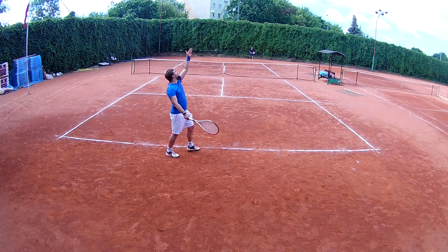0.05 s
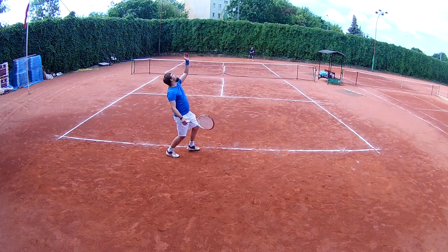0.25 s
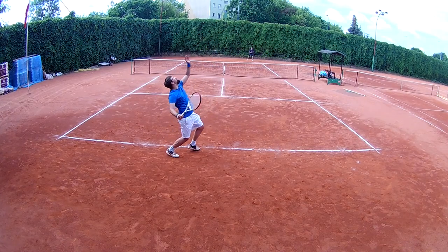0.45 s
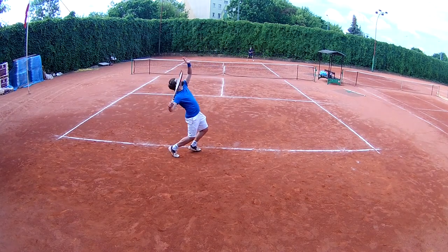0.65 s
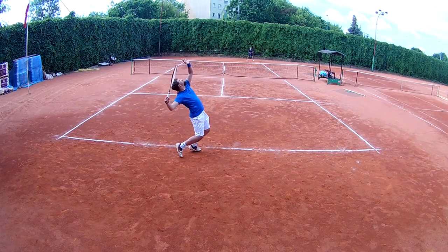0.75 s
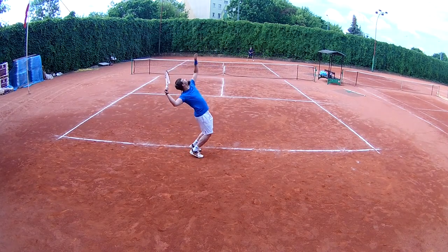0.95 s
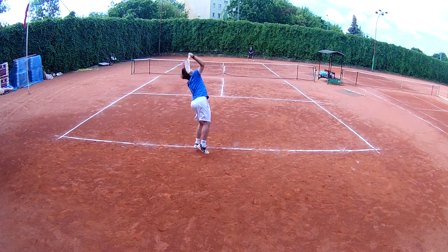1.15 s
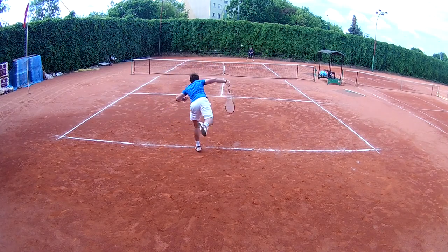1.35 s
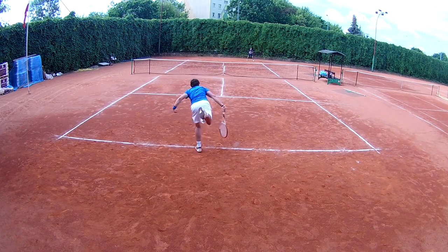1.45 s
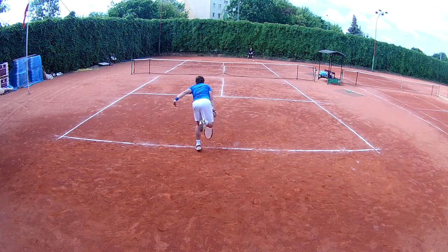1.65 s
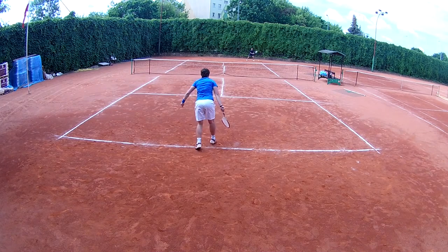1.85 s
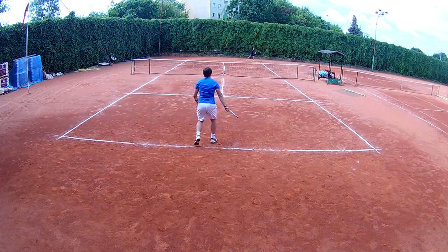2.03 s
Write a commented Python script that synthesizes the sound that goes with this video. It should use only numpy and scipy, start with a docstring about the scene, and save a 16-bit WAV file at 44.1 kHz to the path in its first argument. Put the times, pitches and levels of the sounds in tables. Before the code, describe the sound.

One loud hollow pop of a racket hitting a tennis ball, after a faint push-off thud and scuff; short echoes from hedges, then a distant bounce and shoe scuff, over low traffic rumble, heard from behind the baseline.

```python
"""One hollow pop of a racket hitting a ball: a tennis serve on a clay court, heard from behind the baseline.
The pop is a set of short ringing tones with noise for the crack and buzz, doubled by the ground.
Legs push off, shoes scuff the clay before and after, and the ball lands far off, all as shaped noise.
Hedges and fences answer the serve, scuffs and landing with echoes made of short noise bursts.
Under it all lie distant traffic, a low rumble and a faint microphone hiss, made of steady coloured noise."""
import sys
import numpy as np
from scipy import signal
from scipy.fft import rfft, irfft, next_fast_len
from scipy.io import wavfile
from scipy.ndimage import map_coordinates

SR = 44100
rng = np.random.default_rng(int(sys.argv[2]) if len(sys.argv) > 2 else 0)


def inscribe(sig):
    """Save sig as 16-bit PCM at rate SR to the path in sys.argv[1].

    A 1-D sig is mono; a 2-D sig holds one channel per row.
    Samples are clipped to [-1, 1] before scaling.
    """
    pcm = np.round(np.clip(np.atleast_2d(sig).T, -1, 1) * 32767)
    wavfile.write(sys.argv[1], SR, pcm.astype(np.int16))


N = 92213  # length in samples

ATTACK_S = 0.0007  # quick rise shared by the blow, the bounce and the echoes


def amp(db):
    """Turn decibels into a gain to multiply by."""
    return 10 ** (np.asarray(db) / 20)


def unit(x):
    """Scale a sound to an average (rms) level of 1."""
    return x / np.sqrt(np.mean(x ** 2) + 1e-20)


def along(points, hz):
    """Read a curve of (Hz, value) points at any frequency, on a log frequency axis."""
    point_hz, values = np.transpose(points)
    return np.interp(np.log(hz + 1), np.log(point_hz + 1), values)


def since(start_s):
    """Seconds passed since start_s, zero before it."""
    return np.maximum(np.arange(N) / SR - start_s, 0)


def burst(start_s, rise_s, t60_s, hold_s=0):
    """Loudness shape: rise, hold, then fade by 60 dB every t60_s seconds."""
    rise = 1 - np.exp(-since(start_s) / rise_s)
    fade = amp(-60 * since(start_s + hold_s) / t60_s)
    return rise * fade


def filtered(x, response):
    """Multiply the spectrum of x by a response, given as a function of frequency."""
    size = next_fast_len(N + SR // 2)  # spare room so that delayed sound does not wrap around
    hz = np.fft.rfftfreq(size, 1 / SR)
    return irfft(rfft(x, size) * response(hz), size)[:N]


def noise(spectrum):
    """Random noise coloured by (Hz, dB) points, at rms 1."""
    white = rng.standard_normal(N)
    return unit(filtered(white, lambda hz: amp(along(spectrum, hz))))


def wobble(rate):
    """A smooth random curve through `rate` random points a second."""
    knots = rng.standard_normal(int(N * rate / SR) + 4)
    return map_coordinates(knots, [np.arange(N) * rate / SR])


def background(traffic_sway_db=.5, rumble_sway_db=1.5):
    """Distant traffic and a low rumble are noise of swaying level; microphone hiss is steady noise."""
    # Tone colour of the traffic. Each row: frequency in Hz, level in dB.
    traffic_colour = [(59, -20.5), (100, -4), (124, -3), (207, -10), (239, -8), (347, -11.5), (487, -12.5),
                      (522, -13.5), (624, -15.5), (1140, -13), (1850, -24), (2730, -38.5), (7000, -54.5),
                      (9100, -82.5), (15400, -120)]
    # Slow rise and fall of the traffic. Each row: time in seconds, level in dB.
    traffic_level = [(0, -55), (.42, -55.5), (.66, -54), (1.03, -55), (1.48, -53), (1.74, -56),
                     (2.09, -54.5)]
    # Tone colour of the low rumble. Each row: frequency in Hz, level in dB.
    rumble_colour = [(15, -10), (30, -7.5), (45, -8.5), (61, 4), (76, -8), (110, -12), (170, -26),
                     (400, -60.5)]
    # Tone colour of the microphone hiss. Each row: frequency in Hz, level in dB.
    hiss_colour = [(3000, -10.5), (6000, -2.5), (10000, -3), (12000, -3), (15500, 2.5)]
    rumble_db, hiss_db = -50.5, -80

    level_db = np.interp(since(0), *np.transpose(traffic_level))
    traffic = amp(level_db + traffic_sway_db * wobble(7.93)) * noise(traffic_colour)
    rumble = amp(rumble_db + rumble_sway_db * wobble(7.44)) * noise(rumble_colour)
    hiss = amp(hiss_db) * noise(hiss_colour)
    return traffic + rumble + hiss


def push_off(rise_s=0.0099, t60_s=0.082):
    """As the legs push off, a soft low thud goes through the ground: a burst of deep noise."""
    # Tone colour of the thud. Each row: frequency in Hz, level in dB.
    thud_colour = [(25, 0), (58, 4), (90, -7), (200, -44), (600, -120)]
    start_s, hold_s, level_db = .878, 0.04, -44.5
    return amp(level_db) * noise(thud_colour) * burst(start_s, rise_s, t60_s, hold_s)


def shoes():
    """Each sole slides briefly over loose clay: smooth noise for the rub, sparse clicks for the grains."""
    # The scuffs. Each row: start in seconds, length in seconds before the fade, level in dB,
    # brightness in dB per octave.
    scuffs = [(.890, 0.0043, -56, 3.5), (0.897, 0.02, -51, -1.1), (1.919, 0.0026, -43.5, -4),
              (1.934, 0.02, -45.5, -2.5)]
    # Tone colour of shoe on clay. Each row: frequency in Hz, level in dB.
    clay_colour = [(150, -9), (600, -5.5), (1250, 5.5), (2100, -4), (3000, -18.5), (4200, -22.5),
                   (6500, -36.5), (9000, -51), (16000, -100)]
    rise_s, t60_s = 0.00044, 0.074
    grains_per_s, grit_db = 1500, -4  # grit level is relative to the smooth rub

    out = np.zeros(N)
    for start_s, length_s, level_db, tilt_db in scuffs:
        has_grain = rng.random(N) < grains_per_s / SR
        grit = unit(rng.standard_normal(N) * has_grain)
        rub = rng.standard_normal(N) + amp(grit_db) * grit
        rub = unit(filtered(rub, lambda hz: amp(along(clay_colour, hz) + tilt_db * np.log2(hz + 1))))
        out += amp(level_db) * rub * burst(start_s, rise_s, t60_s, length_s)
    return out


def racket():
    """The blow rings short modes of ball, strings and frame, with a crack of felt and a faint buzz."""
    # Ringing tones of ball, strings and frame. Each row: frequency in Hz, level in dB,
    # time in seconds to fade by 60 dB.
    modes = [(229, -3, .016), (457, -0.5, 0.014), (760, -7, 0.03), (846, -19, 0.077), (1033, -7.5, 0.026),
             (1337, -19, 0.0182), (1536, -22, 0.03), (1890, -31.5, 0.018), (2208, -28, 0.026),
             (3044, -43.5, .03), (4000, -44, 0.053)]
    # Tone colour of felt slapping the strings. Each row: frequency in Hz, level in dB.
    crack_colour = [(300, -8), (1400, 0.5), (2200, -1), (2900, -16.5), (4400, -14.5), (5200, -24),
                    (7200, -25), (8000, -48), (15000, -70)]
    # Tone colour of the after-ring of strings and frame. Each row: frequency in Hz, level in dB.
    buzz_colour = [(800, -13), (1500, 3), (2200, 6), (2900, -8), (3600, -9), (4250, -2.5), (4900, -17),
                   (6800, -22), (8000, -34), (15000, -60)]
    hit_s = 1.2585
    pop_db, crack_db, buzz_db = -9, -32, -56.5
    crack_rise_s, crack_t60_s, buzz_t60_s = 0.0021, .026, 0.29
    contact_hz = 2560  # the soft ball dulls the ringing above this

    t = since(hit_s)
    ring = np.zeros(N)
    for k, (hz, level_db, t60_s) in enumerate(modes):
        sign = (-1) ** (k + 1)  # every other tone starts upside down
        ring += sign * amp(level_db) * np.sin(2 * np.pi * hz * t) * burst(hit_s, ATTACK_S, t60_s)
    pop = signal.lfilter(*signal.butter(2, contact_hz, fs=SR), ring)
    crack = noise(crack_colour) * burst(hit_s, crack_rise_s, crack_t60_s)
    buzz = noise(buzz_colour) * burst(hit_s, ATTACK_S, buzz_t60_s)
    return amp(pop_db) * pop + amp(crack_db) * crack + amp(buzz_db) * buzz


def ground(x):
    """Sound also reaches the ear by way of the clay: add one slightly later, weaker copy."""
    delay_s, gain = .00554, 0.74
    return filtered(x, lambda hz: 1 + gain * np.exp(-2j * np.pi * hz * delay_s))


def court(x):
    """Hedges and fences scatter the sound into blurred echoes, over a thin tail from all around."""
    # Echoes off hedges and fences. Each row: delay in seconds, level in dB before colouring.
    echoes = [(.021, -24), (.032, -17.5), (.044, -24.5), (0.063, -27.5), (0.099, -26.5), (.124, -25)]
    # How the tail dies away. Each row: frequency in Hz, time in seconds to fade by 60 dB.
    tail_fade = [(150, 0.65), (800, 0.64), (2000, 0.97), (6000, 0.26)]
    # Tone colour of all that comes back. Each row: frequency in Hz, level in dB.
    return_colour = [(150, -5), (300, 3), (500, -1), (730, -2), (900, 5.5), (1050, -2), (1400, 3),
                     (2200, -5), (3200, 5), (6500, 6.5), (9000, 0)]
    echo_t60_s, tail_db, tail_delay_s = 0.032, -20, .012

    # Fade each frequency band of white noise at its own speed.
    hz, t, bands = signal.stft(rng.standard_normal(N), SR, nperseg=256)
    fade = amp(-60 * t / along(tail_fade, hz)[:, None])
    tail = signal.istft(bands * fade, SR, nperseg=256)[1][:N]
    tail = tail * (since(tail_delay_s) > 0)
    answer = amp(tail_db) * tail / np.linalg.norm(tail)  # the court's reply to one click
    for delay_s, level_db in echoes:
        scatter = rng.standard_normal(N) * burst(delay_s, ATTACK_S, echo_t60_s)
        answer += amp(level_db) * scatter / np.linalg.norm(scatter)
    returned = signal.fftconvolve(x, answer)[:N]
    return filtered(returned, lambda hz: amp(along(return_colour, hz)))


def bounce():
    """The ball lands far off with a dull pat on the clay: a short burst of mostly low noise."""
    # Tone colour of the landing. Each row: frequency in Hz, level in dB.
    pat_colour = [(50, -14), (150, 0), (400, 6), (900, 2), (2000, -13), (3200, -32), (5000, -38),
                  (9000, -60)]
    start_s, level_db, t60_s = 1.8655, -44, 0.068
    return amp(level_db) * noise(pat_colour) * burst(start_s, ATTACK_S, t60_s)


def scene():
    """The serve, the footwork and the landing ball in the open court, as one channel."""
    play = shoes() + ground(racket()) + bounce()
    return (background() + push_off() + play + court(play))[None]


def record(dry):
    """Only sound below the upper band limit is kept."""
    top_hz = 15800
    return np.array([filtered(channel, lambda hz: hz < top_hz) for channel in dry])


dry = scene()
out = record(dry)
inscribe(out)
```